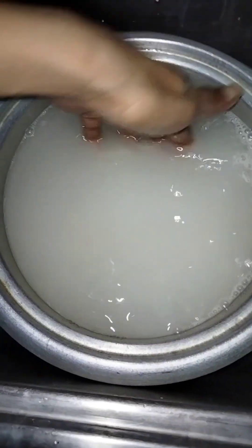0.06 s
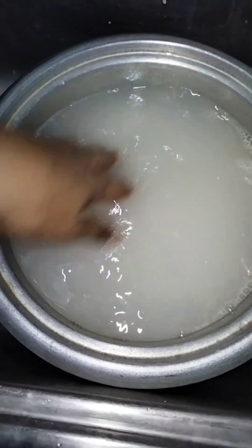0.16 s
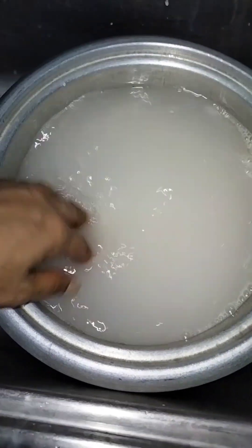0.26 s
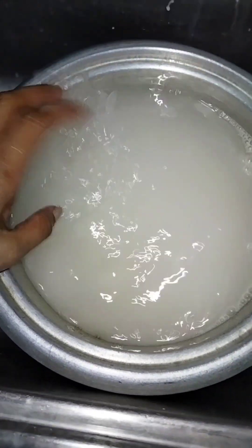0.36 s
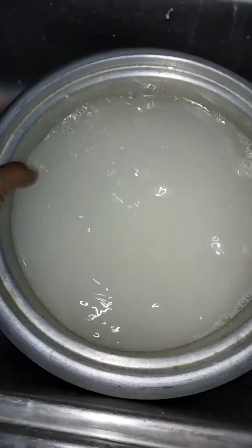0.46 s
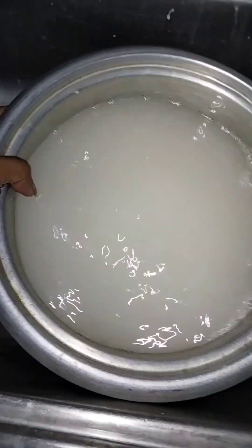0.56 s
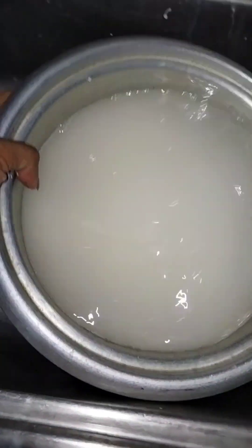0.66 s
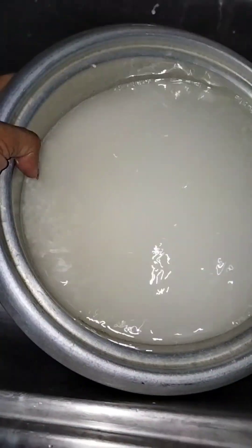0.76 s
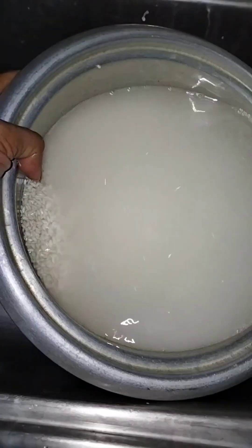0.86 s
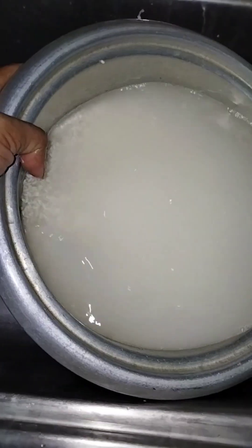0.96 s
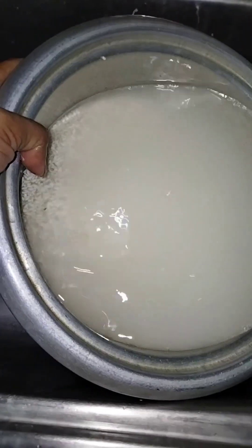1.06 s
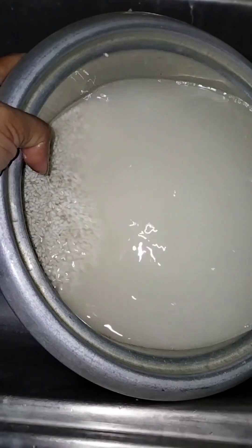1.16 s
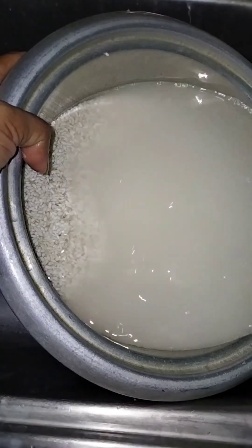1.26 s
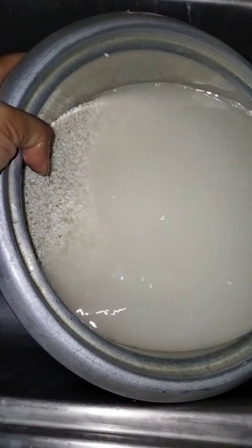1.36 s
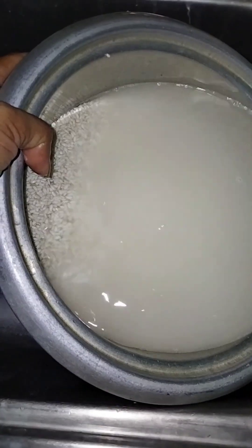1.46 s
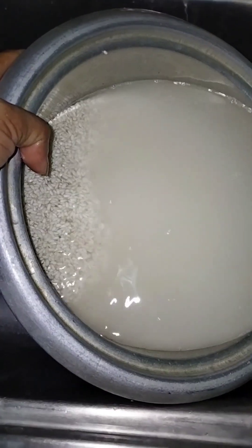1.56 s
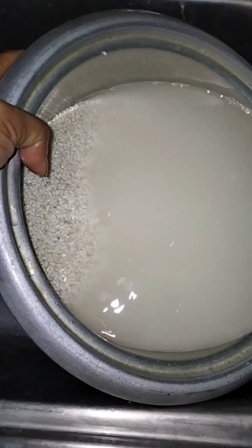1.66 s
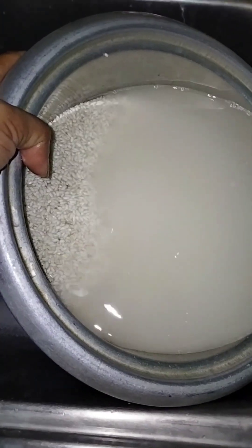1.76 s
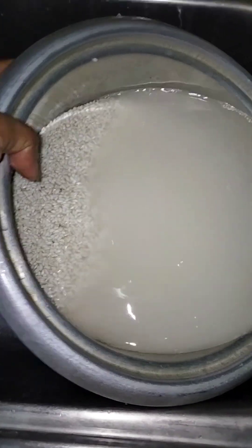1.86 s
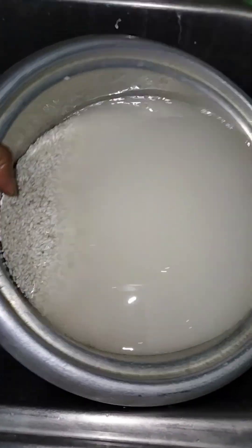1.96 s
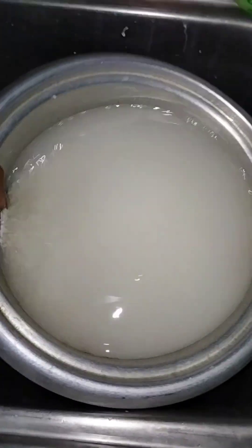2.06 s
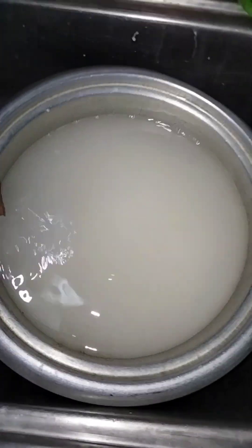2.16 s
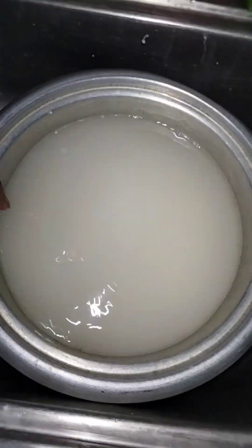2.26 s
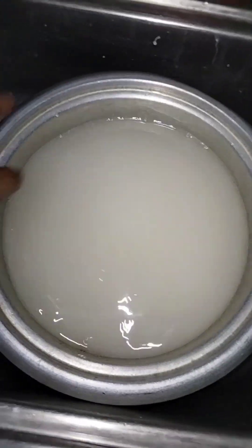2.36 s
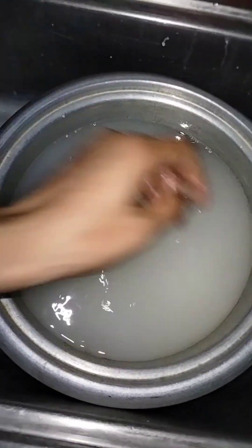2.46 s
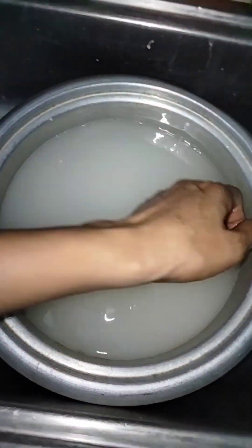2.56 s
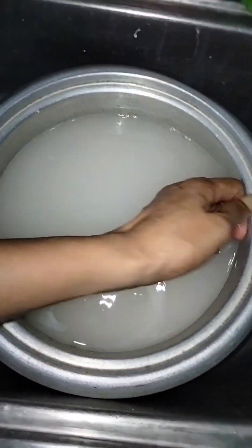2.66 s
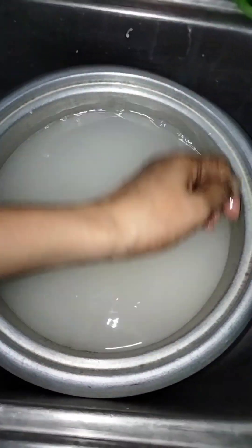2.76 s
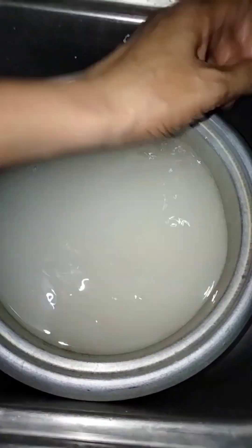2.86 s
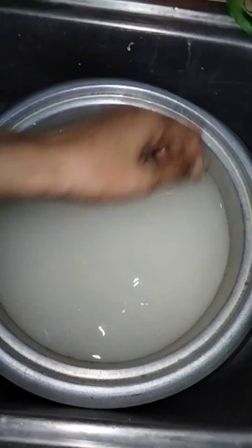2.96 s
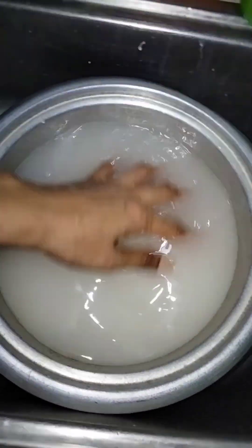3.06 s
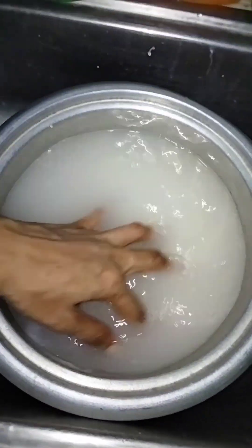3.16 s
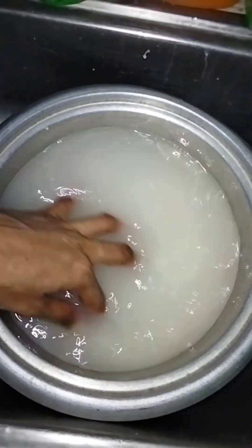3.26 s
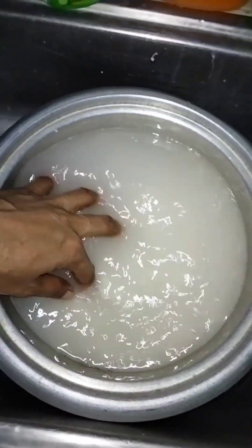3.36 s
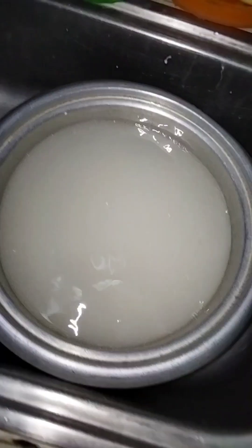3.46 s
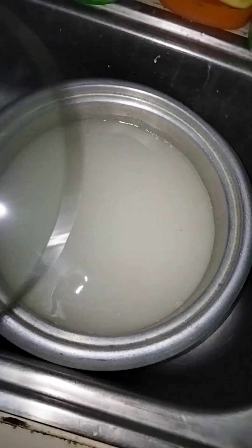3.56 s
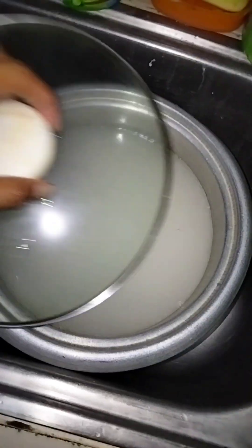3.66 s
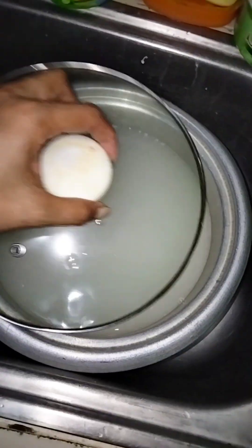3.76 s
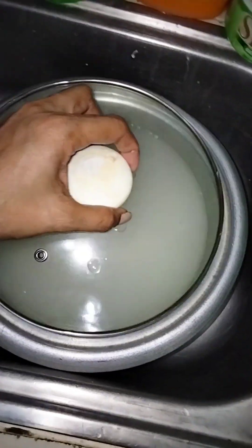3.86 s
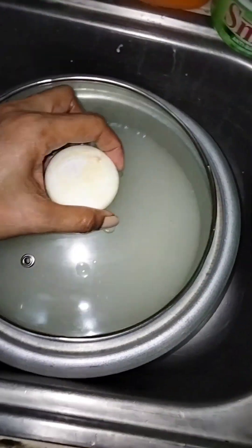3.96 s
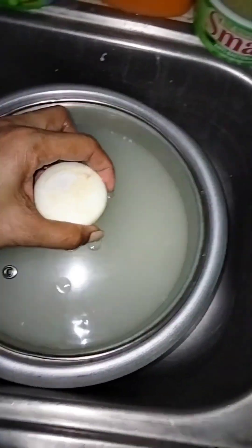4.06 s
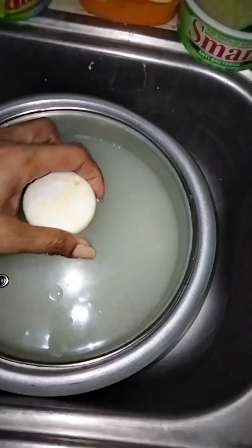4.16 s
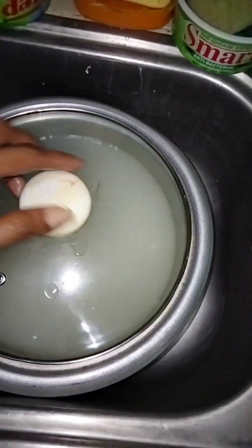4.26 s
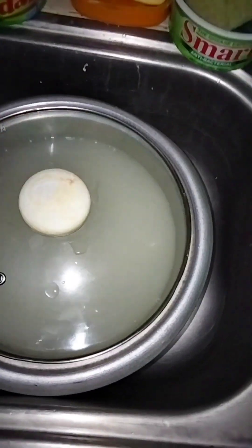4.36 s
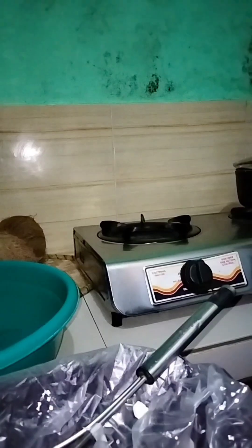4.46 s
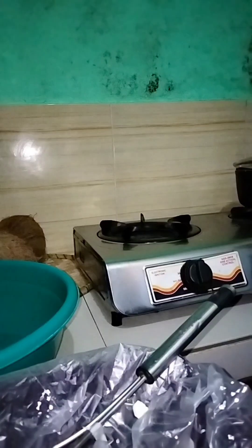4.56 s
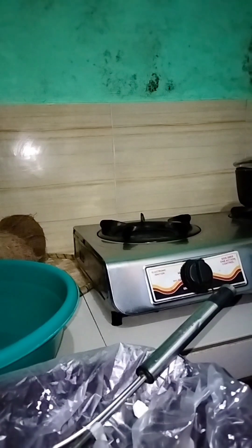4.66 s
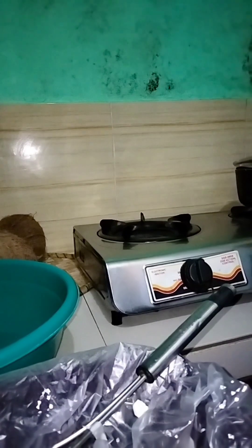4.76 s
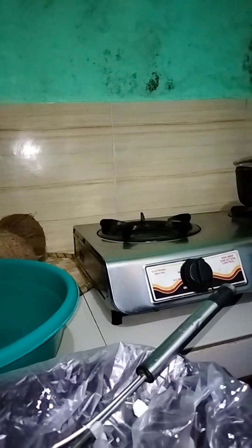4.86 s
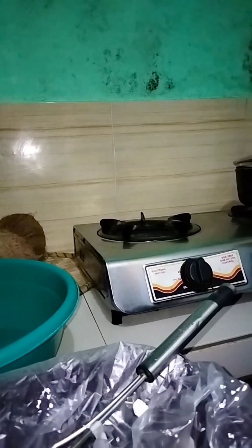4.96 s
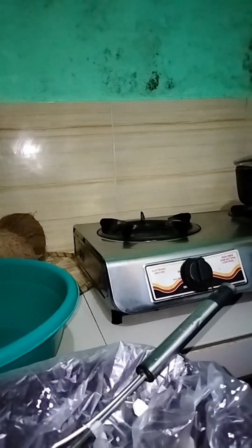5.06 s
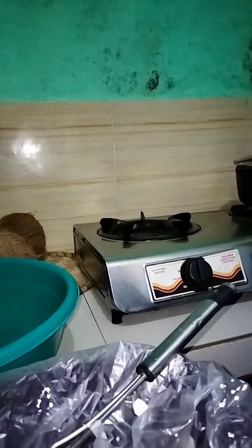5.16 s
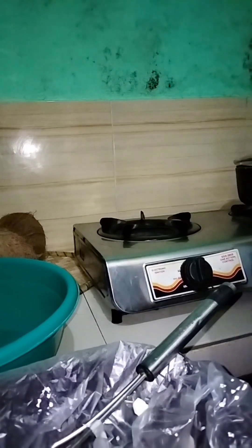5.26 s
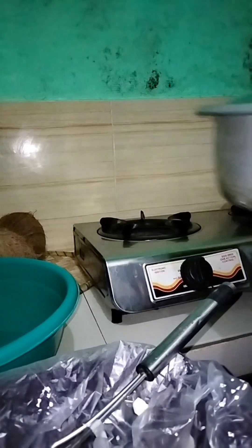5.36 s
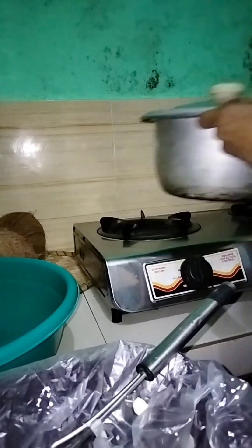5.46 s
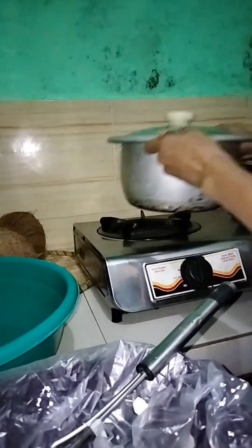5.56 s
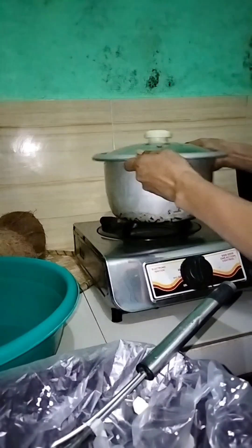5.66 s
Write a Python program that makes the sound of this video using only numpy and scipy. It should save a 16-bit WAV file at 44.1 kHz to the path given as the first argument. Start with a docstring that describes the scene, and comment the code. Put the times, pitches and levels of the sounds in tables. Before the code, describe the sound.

Close, slightly thin pickup of rice washing in a small kitchen. A dull knock comes early, then sharp grainy clicks, a fine wet rustle and small ringing drops, with a soft slosh as the pot settles. After sparse taps and a lull, a glass lid clatters onto the metal rim in two main contacts, the second heaviest. One last faint stir of grains fades into hum.

```python
"""A quiet kitchen hums and hisses throughout. A thin metal pot of rice and water first thumps on a steel sink.
Tipped and swirled, its wet grains rustle and tick, water sloshes and drops ring: enveloped grain noise and sines.
A fingertip pings the rim, then a glass lid rattles on as the pot thumps hardest: contacts ring decaying modes.
A last stir of rice and a few ticks follow. The treble spectra peak near 9 kHz, lifted by the small microphone."""
import sys
import numpy as np
from scipy import signal
from scipy.fft import rfft, irfft
from scipy.io import wavfile

SR = 44100
rng = np.random.default_rng(int(sys.argv[2]) if len(sys.argv) > 2 else 0)


def dump(signal):
    """Clip the signal to [-1, 1] and save it as 16-bit WAV at the path in sys.argv[1]."""
    limited = np.clip(np.atleast_2d(signal).T, -1, 1)
    pcm = np.round(limited * 32767).astype(np.int16)
    wavfile.write(sys.argv[1], SR, pcm)


N = 251811


def from_db(db):
    """Decibels to gain."""
    return 10 ** (np.asarray(db) / 20)


def rms_one(x):
    """Scale to rms 1."""
    return x / np.sqrt(np.mean(x ** 2) + 1e-20)


def in_time(rows):
    """Columns of a curve table interpolated at every sample."""
    time_s, *columns = np.transpose(rows)
    return [np.interp(np.arange(N) / SR, time_s, column) for column in columns]


def colour(x, spectrum):
    """Causal unit-energy filter with the given spectrum, minimum phase through the cepstrum."""
    hz, db = np.transpose(spectrum)
    size, half = 16384, 8192
    grid_hz = np.maximum(np.fft.rfftfreq(size, 1 / SR), 1)
    grid_db = np.interp(np.log(grid_hz), np.log(hz), db, left=-60, right=-60)
    cepstrum = irfft(grid_db * np.log(10) / 20)
    # fold onto positive time
    cepstrum[1:half] *= 2
    cepstrum[half + 1:] = 0
    impulse = irfft(np.exp(rfft(cepstrum)))[:half]
    return signal.fftconvolve(x, impulse / np.sqrt(np.sum(impulse ** 2)))[:len(x)]


def drift(rate_hz):
    """Slow random wander: noise through a double real pole; mean 0, spread 1."""
    r = np.exp(-2 * np.pi * rate_hz / SR)
    slow = signal.lfilter([1], [1, -2 * r, r * r], rng.standard_normal(N + SR))[SR:]
    return rms_one(slow - slow.mean())


def grains(per_s, spread_db, clump_db, clump_hz, smooth):
    """Random clicks of uneven size over smooth noise, arriving in clumps; rms 1."""
    sizes = from_db(spread_db * np.minimum(rng.exponential(1, N), 4)) * rng.choice([-1, 1], N)
    clicks = rms_one(sizes * (rng.random(N) < per_s / SR))
    bed = smooth * rng.standard_normal(N)
    clumps = from_db(clump_db * drift(clump_hz))
    return rms_one((clicks + bed) * clumps)


def add(out, time_s, sound):
    """Mix a sound in at a moment."""
    i = round(time_s * SR)
    out[i:i + len(sound)] += sound[:N - i]


def ring(clicks, hz, t60_s):
    """Two-pole resonator: a unit click sets a sine of about height 1 ringing."""
    r, w = from_db(-60 / (t60_s * SR)), 2 * np.pi * hz / SR
    return signal.lfilter([0, np.sin(w)], [1, -2 * r * np.cos(w), r * r], clicks + 1e-18)


def bubbles(clicks, low_hz, high_hz, cycles, count):
    """Every click is a small bubble: it is dealt a pitch and rings for some cycles; rms 1."""
    dealt = rng.integers(0, count, N)
    total = np.zeros(N)
    for k, hz in enumerate(np.geomspace(low_hz, high_hz, count)):
        total += ring(clicks * (dealt == k), hz, cycles / hz) * np.sqrt(hz)
    return rms_one(total)


def swell(t, rise_s, t60_s):
    """Rounded rise, then an exponential fall."""
    rise = 1 - np.exp(-(t / max(rise_s, .0002)) ** 2)
    return rise * from_db(-60 * t / max(t60_s, .004))


# rumble swell: (time [s], level [dB])
RUMBLE_LEVEL = [(0.0, -61), (0.38, -65.5), (0.7, -56.5), (0.9, -66.5), (1.4, -67.5), (2.22, -59),
                (3.32, -64), (3.61, -61.5), (4.05, -65), (4.33, -57.5), (4.61, -66), (5.12, -63.5),
                (5.71, -66.5)]
# rumble spectrum: (frequency [Hz], relative density [dB])
RUMBLE_SPECTRUM = [(8.8, -27.5), (15, 9.5), (33, -1.5), (41, -0.5), (49, -28), (65, -6), (124, -6.5),
                   (137, -5.5), (151, -26.5), (200, -22), (260, -52), (440, -120)]
# still air and microphone hiss: (frequency [Hz], relative density [dB])
HISS_SPECTRUM = [(88, -30), (150, -10), (209, -25.5), (309, -6.5), (431, -9.5), (837, -18), (998, -13.5),
                 (1390, -19), (2270, -24), (5910, -30), (7620, -28), (8730, -19), (10400, -31),
                 (15100, -29), (16000, -35)]
HISS_DB = -81.5


def hum():
    """Low rumble of the building, wavering in level, over a steady smooth hiss; both coloured noise."""
    level_db, = in_time(RUMBLE_LEVEL)
    rumble = from_db(level_db + .8 * drift(4.6)) * colour(rng.standard_normal(N), RUMBLE_SPECTRUM)
    return rumble + from_db(HISS_DB) * colour(rng.standard_normal(N), HISS_SPECTRUM)


# thin tones: (time [s], length [s], frequency [Hz], glide [Hz/s], start level [dB], fade [dB/s])
FAINT_TONES = [(0.215, 0.069, 800, 1, -72, 36), (0.23, 0.041, 1055, 2, -69, 60),
               (0.7, 0.21, 515, -120, -69, 52), (1.122, 0.11, 736, 207, -70.5, 126),
               (3.593, 0.17, 9380, 398.5, -90, 60), (3.965, 0.14, 607, 400, -54.5, 115),
               (4.412, 0.2, 9300, 897.5, -80.5, 87), (4.507, 0.042, 676, -6, -63, 105),
               (4.595, 0.06, 506, 9, -70.5, 55), (4.73, 0.077, 508, 0, -75, -38),
               (4.83, 0.092, 497, 4.5, -68, 197), (4.95, 0.065, 522, 0, -70, 4),
               (5.02, 0.099, 498, -150, -87, 0), (5.58, 0.17, 615, 150, -84.5, 3),
               (5.58, 0.16, 1230, 295, -87.5, 5)]


def faint_tones():
    """Slightly unsteady sines that glide a little, change level and stop."""
    out = np.zeros(N)
    for time_s, length_s, hz, glide_hz_per_s, start_db, fade_db_per_s in FAINT_TONES:
        t = np.arange(round(length_s * SR)) / SR
        gate = np.clip(np.minimum(t, length_s - t) / 0.0086, 0, 1)
        sine = np.sqrt(2) * np.sin(2 * np.pi * (hz + glide_hz_per_s * t / 2) * t)
        add(out, time_s, gate * from_db(start_db - fade_db_per_s * t) * sine)
    return out * from_db(3.0 * drift(30))


KITCHEN_T60_S, WALL_CUT_HZ = 0.2, 22000


def kitchen(x):
    """Diffuse tail: dying noise after 4 ms, with a nearly open low-pass for the walls."""
    t = np.arange(SR // 2) / SR
    tail = rng.standard_normal(len(t)) * from_db(-60 * t / KITCHEN_T60_S) * (t > .004)
    tail = signal.sosfilt(signal.butter(1, WALL_CUT_HZ, fs=SR, output="sos"), tail)
    return signal.fftconvolve(x, tail / np.sqrt(np.sum(tail ** 2)))[:N]


# water against hand and wall: (time [s], level [dB])
LAPPING_LEVEL = [(0.0, -58.5), (0.085, -77.5), (0.11, -58.5), (0.17, -84), (0.25, -75.5), (0.426, -85),
                 (0.62, -74), (0.842, -81.5), (1.3, -82.5), (1.5, -78), (1.63, -83.5), (1.786, -74),
                 (2.1, -70.5), (2.35, -72.5), (2.55, -77), (2.62, -74.5), (2.69, -79), (2.75, -73),
                 (3.126, -89.5), (3.8, -86), (4.008, -65.5), (4.05, -72.5), (4.12, -68.5), (4.562, -80.5),
                 (4.682, -91), (5.0, -78.5), (5.42, -93), (5.71, -88.5)]
# lapping spectrum: (frequency [Hz], relative density [dB])
LAPPING_SPECTRUM = [(290, -27), (500, -0.5), (555, -13.5), (607, -1.5), (1090, -6), (1470, -10),
                    (2600, -11.5), (3380, -50), (5720, -120)]


def lapping():
    """Water laps against hand and wall: middle-sized bubbles ring in a soft wash."""
    level_db, = in_time(LAPPING_LEVEL)
    pops = grains(600, 2.8, 1.4, 20, smooth=1.1)
    wash = bubbles(pops, 500, 2600, 22.0, count=14)
    return from_db(level_db) * rms_one(colour(wash, LAPPING_SPECTRUM))


CHIRPS_PER_S, CHIRP_T60_S = 70, 0.025
CHIRP_RISE_PER_S = 11   # share of the pitch


def chirps():
    """Small drops at random moments, pitches and sizes, each rising in pitch as it dies."""
    out, t = np.zeros(N), np.arange(SR // 20) / SR
    for when, pitch, size in rng.random((round(CHIRPS_PER_S * N / SR), 3)):
        hz = 2200 * 2.8 ** pitch * (1 + CHIRP_RISE_PER_S * t / 2)
        fall = from_db(-16 * size) * swell(t, .001, CHIRP_T60_S)
        add(out, when * N / SR, fall * np.sin(2 * np.pi * hz * t))
    return out


# wet rice, fine rustle: (time [s], level [dB])
RICE_LEVEL = [(0.0, -89.5), (0.59, -80.5), (0.638, -72.5), (0.778, -86.5), (1.2, -85.5), (1.444, -60),
              (1.746, -91), (1.794, -61), (1.91, -55), (1.966, -63.5), (2.038, -57), (2.3, -74),
              (2.694, -87.5), (3.3, -83), (3.6, -100), (3.89, -87), (3.94, -48), (4.062, -85.5),
              (4.128, -59.5), (4.3, -72), (4.496, -92), (4.784, -87.5), (4.942, -64), (5.05, -78.5),
              (5.47, -86), (5.606, -68), (5.71, -81.5)]
# moving water, low slosh: (time [s], level [dB])
WATER_LEVEL = [(0.0, -58.5), (0.092, -87.5), (0.59, -76.5), (0.638, -57), (0.778, -79), (1.018, -81.5),
               (1.2, -69.5), (1.318, -79), (1.444, -67), (1.7, -76.5), (1.91, -64.5), (2.1, -59.5),
               (2.172, -54), (2.3, -68.5), (2.5, -67.5), (2.694, -79.5), (3.8, -83), (3.94, -54),
               (4.062, -79), (4.128, -35.5), (4.3, -62.5), (4.496, -74), (4.6, -80.5), (4.942, -73.5),
               (5.2, -77), (5.71, -82.5)]
# fine grain spectrum, also of ticks: (frequency [Hz], relative density [dB])
RUSTLE_SPECTRUM = [(3530, -23), (6000, -20), (6870, -17), (7960, -5.5), (8790, 0), (9230, -2.5),
                   (9980, -10.5), (10800, -12), (13600, -17.5), (15100, -12), (16000, -34.5)]
# splash spectrum, also of ticks: (frequency [Hz], relative density [dB])
SPLASH_SPECTRUM = [(590, -33), (1000, -14), (1750, -11.5), (2170, -4), (3180, -5), (3530, -3.5), (4330, -3),
                   (7000, -10), (9100, -46.5), (15400, -120)]
# slosh spectrum: (frequency [Hz], relative density [dB])
SLOSH_SPECTRUM = [(76, -34), (130, -10.5), (216, -13.5), (255, -7), (479, -5), (554, -19), (610, -8),
                  (900, -19.5), (1170, -44.5), (1980, -120)]
SPLASH_DB, SPLASH_FOLLOWS = -86.5, 0.83   # splash at a rustle of -80 dB; share of the rustle's swing
CHIRP_DB = 12   # largest chirps, over the splash


def stirring():
    """Rice rubs on rice and metal in fine grains; water fizzes in small bubbles and sloshes in large ones."""
    (rustle_db,), (slosh_db,) = in_time(RICE_LEVEL), in_time(WATER_LEVEL)
    splash_db = SPLASH_DB + SPLASH_FOLLOWS * (rustle_db + 80)
    surge = from_db(0.97 * drift(20))      # shared by rustle and splash
    rubs = bubbles(grains(6900, 2.1, 1.1, 72, smooth=.7), 4500, 22000, 19.0, count=14)
    fizz = grains(1800, 3.6, 1.6, 40, smooth=.8)
    gurgle = grains(300, 3.0, 1.8, 12, smooth=.9)
    rustle = rms_one(colour(rubs, RUSTLE_SPECTRUM))
    splash = rms_one(colour(bubbles(fizz, 900, 6500, 18.0, count=16), SPLASH_SPECTRUM))
    slosh = rms_one(colour(bubbles(gurgle, 150, 1018, 21.0, count=12), SLOSH_SPECTRUM))
    splash = splash + from_db(CHIRP_DB) * chirps()
    treble = surge * (from_db(rustle_db) * rustle + from_db(splash_db) * splash)
    return treble + from_db(slosh_db) * slosh


# drops ringing near one pitch: (time [s], nominal level [dB], frequency [Hz], t60 [s])
DROP_HITS = [(0.103, -54, 1094, 0.036), (0.401, -55, 972, 0.026), (0.404, -48.5, 1271, 0.08),
             (0.405, -52, 2230, 0.05), (0.6156, -47, 2090, 0.042), (1.3175, -47, 4440, 0.023),
             (1.4302, -24, 3590, 0.02), (1.722, -62.5, 5100, 0.13), (1.842, -48, 3120, 0.048),
             (1.8526, -40, 2930, 0.03), (1.8612, -39, 3490, 0.042), (1.934, -49.5, 3950, 0.072),
             (1.953, -53, 3050, 0.068), (2.0502, -51, 2220, 0.049), (2.0624, -37, 4800, 0.028),
             (2.079, -45, 5420, 0.056), (2.9223, -55, 3400, 0.019), (3.086, -67.5, 1510, 0.066),
             (3.15, -60, 2080, 0.012), (3.477, -58, 4270, 0.014), (4.9858, -50, 3795, 0.044),
             (5.003, -52.5, 1905, 0.028)]
BEAT_SHARE = 0.046   # pitch spread at 4 kHz, in proportion elsewhere
MAX_RISE_S = 0.003   # drops and ticks


def drops():
    """Each drop is a knot of three bubbles beating near one pitch."""
    out, t = np.zeros(N), np.arange(SR // 7) / SR
    detunings = rng.normal(0, 1, (len(DROP_HITS), 3, 1))
    for (time_s, level_db, hz, t60_s), detuning in zip(DROP_HITS, detunings):
        bubble_hz = hz * (1 + BEAT_SHARE * hz / 4000 * detuning)
        knot = np.sum(np.sin(2 * np.pi * bubble_hz * t), axis=0)
        envelope = swell(t, min(MAX_RISE_S, t60_s / 10), t60_s)
        add(out, time_s, from_db(level_db - 3) * envelope * knot)
    return out


# grain and drop ticks, levels before the mix trims:
# (time [s], level above 6.5 kHz [dB], level of 1.2-6.5 kHz [dB], t60 [s])
TICK_HITS = [(0.006, -77, -70, 0.097), (0.097, -82.5, -67, 0.085), (0.133, -63, -69, 0.037),
             (0.224, -61, -88, 0.025), (0.397, -51, -55.5, 0.034), (0.404, -55, -53.5, 0.13),
             (0.428, -52, -52, 0.036), (0.4574, -49, -56, 0.063), (0.478, -60, -88, 0.12),
             (0.6144, -39.5, -42.5, 0.064), (1.263, -52, -86, 0.024), (1.282, -51.5, -84, 0.036),
             (1.3182, -34, -44.5, 0.025), (1.347, -47, -81, 0.069), (1.367, -51, -87, 0.076),
             (1.4293, -25.5, -39, 0.03), (1.464, -48, -50.5, 0.092), (1.475, -45, -43, 0.041),
             (1.508, -42.5, -64, 0.046), (1.5254, -54, -55, 0.09), (1.5783, -50, -89, 0.026),
             (1.6016, -44.5, -86, 0.026), (1.69, -53, -82, 0.073), (1.717, -61, -67, 0.11),
             (1.7374, -52.5, -72, 0.2), (1.77, -39, -81, 0.035), (1.8018, -31, -64, 0.032),
             (1.84, -36, -47, 0.058), (1.852, -32.5, -63, 0.024), (1.859, -56, -48.5, 0.065),
             (1.8806, -34, -70, 0.031), (1.9345, -42, -48.5, 0.089), (1.953, -39, -49, 0.035),
             (1.9969, -45, -82, 0.043), (2.032, -42.5, -52.5, 0.12), (2.0513, -37, -43, 0.077),
             (2.0637, -38.5, -49, 0.038), (2.078, -43.5, -54, 0.19), (2.165, -52, -72, 0.048),
             (2.192, -61, -62, 0.088), (2.4316, -62, -67, 0.15), (2.695, -62, -66, 0.14),
             (2.706, -68, -55.5, 0.04), (2.7467, -37, -48, 0.042), (2.9226, -49.5, -69, 0.016),
             (3.086, -50.5, -60.5, 0.037), (3.15, -36, -42, 0.015), (3.476, -43, -46.5, 0.013),
             (3.548, -63.5, -70, 0.056), (4.6865, -64.5, -70, 0.066), (4.798, -60.5, -71, 0.059),
             (4.8423, -54, -68, 0.038), (4.931, -55.5, -77, 0.064), (4.986, -48, -56.5, 0.11),
             (5.0044, -46, -54.5, 0.038), (5.282, -67, -65, 0.048), (5.3452, -64, -66.5, 0.36),
             (5.378, -61, -57, 0.029)]


def ticks():
    """Each tick is a burst that swells and dies fast, gritty when short and smooth when long."""
    top, middle, t = np.zeros((2, N)), np.zeros((2, N)), np.arange(SR // 7) / SR
    for time_s, top_db, middle_db, t60_s in TICK_HITS:
        envelope = swell(t, min(MAX_RISE_S, t60_s / 10), t60_s)
        start_s = time_s - MAX_RISE_S / 2
        smooth = np.clip((t60_s - .04) / .07, 0, 1)
        for kind, share in enumerate(np.sqrt([1 - smooth, smooth])):   # gritty, smooth
            add(top[kind], start_s, share * from_db(top_db) * envelope)
            add(middle[kind], start_s, share * from_db(middle_db) * envelope)
    grit = top[0] * grains(5000, 3.1, 0.55, 250, smooth=0.84) + top[1] * rng.standard_normal(N)
    spray = middle[0] * grains(2500, 1.6, 1.0, 130, smooth=0.61) + middle[1] * rng.standard_normal(N)
    spray_rms = np.sqrt(np.mean(spray ** 2))
    fizz = bubbles(spray, 1200, 6500, 16.0, count=14) * spray_rms
    return from_db(-4.5) * colour(grit, RUSTLE_SPECTRUM) + from_db(-8.5) * colour(fizz, SPLASH_SPECTRUM)


# fingertip on the pot's rim: (time [s], level [dB], rise [s])
PING_HITS = [(2.692, -63, 0.008), (2.746, -49.5, 0.0022)]
# rim modes: (frequency [Hz], relative level [dB], t60 [s])
RIM_MODES = [(4000, -6, 0.036), (4480, -3, 0.051), (5100, 0, 0.03), (6300, -18, 0.035), (7000, 3.5, 0.078),
             (8630, 6, 0.078)]


def pings():
    """A light touch rings the rim modes, with uneven strengths."""
    out, t = np.zeros(N), np.arange(SR // 7) / SR
    luck_db = rng.normal(0, 2, (len(PING_HITS), len(RIM_MODES)))
    for (time_s, level_db, rise_s), strengths_db in zip(PING_HITS, luck_db):
        for (hz, mode_db, t60_s), strength_db in zip(RIM_MODES, strengths_db):
            gain = from_db(level_db + mode_db + strength_db)
            add(out, time_s, gain * swell(t, rise_s, t60_s) * np.sin(2 * np.pi * hz * t))
    return out


# glass lid on the rim, before the mix trims:
# (time [s], level [dB], t60 of the contact [s], ringing against the crack [dB])
LID_TOUCHES = [(3.8429, -16, 0.015, -22), (3.845, -23, 0.03, -18.5), (3.891, -37, 0.051, -32),
               (3.92, -14.5, 0.046, -21), (3.943, -33, 0.078, -44), (4.0902, -36.5, 0.13, -25),
               (4.1044, -37.5, 0.33, -30), (4.121, -12, 0.068, -21), (4.136, -26, 0.026, -32),
               (4.1474, -30.5, 0.071, -44), (4.1734, -18.5, 0.027, -22.5), (4.2546, -41.5, 0.034, -21),
               (4.305, -46.5, 0.13, -24), (4.326, -46, 0.12, -26), (4.3424, -47, 0.048, -26),
               (4.3803, -61.5, 0.074, -28), (4.395, -51, 0.046, -23), (4.4776, -34.5, 0.015, -30)]
# glass modes: (frequency [Hz], relative level [dB], t60 before finger damping [s])
LID_MODES = [(2964, -27, 0.091), (3260, -0.5, 0.085), (3655, -25, 0.18), (3980, -17, 0.23),
             (4940, -28.5, 0.16), (5204, -8, 0.074), (5010, -6, 0.07), (6250, -5, 0.056), (7140, -8, 0.039),
             (7260, -19, 0.11), (7400, -6, 0.098), (8118, -17.5, 0.28), (8500, -5, 0.4), (9910, -6.5, 0.26)]
# crack spectrum: (frequency [Hz], relative density [dB])
CRACK_SPECTRUM = [(530, -8), (900, -15), (1440, -39.5), (1600, -4), (2600, -5), (3190, -2), (4630, -4.5),
                  (5040, -11.5), (5890, -19), (7310, -5.5), (8980, 2.5), (9880, -7.5), (16000, -12)]
LID_RISE_SHARE = 0.098   # of the t60, then limited to 1.2-5 ms
FINGER_T60_S = 0.045


def lid():
    """Each touch is a rattle of tiny contacts: they crack, and they shake the lid modes, damped by the fingers."""
    cracks, shake, t = np.zeros(N), np.zeros(N), np.arange(SR // 7) / SR
    for time_s, level_db, t60_s, ring_db in LID_TOUCHES:
        rise_s = np.clip(LID_RISE_SHARE * t60_s, .0012, .005)
        envelope = swell(t, rise_s, t60_s)
        add(cracks, time_s - rise_s / 2, from_db(level_db - 9.0) * envelope)
        add(shake, time_s - rise_s / 2, from_db(level_db - 9.5 + ring_db) * envelope)
    contacts = grains(6000, 4.2, 1.4, 300, smooth=0.74)
    dealt = rng.random((len(LID_MODES), N)) < .3      # each contact reaches only some modes
    rings = np.zeros(N)
    for (hz, mode_db, t60_s), reached in zip(LID_MODES, dealt):
        push = shake * contacts * reached * from_db(4 * drift(12))
        damped_t60_s = 1 / (1 / t60_s + 1 / FINGER_T60_S)
        rings += from_db(mode_db) * ring(push, hz, damped_t60_s)
    return rings + colour(cracks * contacts, CRACK_SPECTRUM)


# pot on basin:
# (time [s], level [dB], ring length factor, deep mode gain [dB], brightness [dB/octave])
THUMP_HITS = [(0.098, -66.5, 1, -11, 1.5), (0.458, -73.5, 1, 15, -14), (0.615, -34, 0.69, 1, -9),
              (0.978, -47, 0.75, -2.5, -22), (1.462, -62.5, 0.62, -17, 2), (1.496, -58.5, 0.41, -26, 3),
              (2.114, -41, 0.98, 4.5, -9), (2.137, -51, 0.91, 5, -18), (2.399, -61.5, 1, 7, -10),
              (2.443, -47.5, 0.78, 1.5, -8.5), (2.708, -49.5, 0.49, 4.5, -5.5), (2.745, -55, 0.81, 0.5, -6),
              (2.976, -65.5, 0.53, -33, -5), (3.165, -67, 0.42, -17, -5), (3.552, -70, 0.52, 8, -8),
              (3.84, -42, 0.67, -3, -8.5), (3.919, -33, 1, -5.5, -7.5), (3.96, -32, 0.39, -12, -12.5),
              (4.095, -47, 0.85, -23.5, -14), (4.124, -23, 0.68, -6, -6.5), (4.149, -37.5, 1, 2.5, -4.5),
              (4.174, -49.5, 0.66, 19.5, 0.5), (4.336, -58, 0.66, 15, -1), (4.419, -53.5, 0.35, 9.5, -9),
              (4.431, -53.5, 0.46, 1, -8), (4.692, -65, 0.39, 9, -27), (4.995, -53.5, 0.51, -8, -6.5)]
# basin modes: (frequency [Hz], relative level [dB], t60 before wet damping and length factor [s])
BASIN_MODES = [(80.4, -7.5, 0.18), (148.3, 2.5, 0.2), (191.2, -2.5, 0.2), (259, 1.5, 0.16),
               (285.7, -3, 0.32), (331, -6, 0.57), (386.2, -6.5, 0.54), (452.7, 4.5, 0.11),
               (499, -14.5, 0.56), (593, 5, 0.058), (745, -2.5, 0.14), (962, -2, 0.22), (924, -10.5, 0.12),
               (1260, -17.5, 0.3), (805, -5, 0.3), (966, -13.5, 0.12), (1077, -4.5, .1)]
DEEP_HZ, PIVOT_HZ = 145, 300   # deep gain is full up to the first; brightness tilts above the second
WASH_DB = -7.5   # against the thump level


def thumps():
    """A soft contact rings the basin modes; where it lands sets the balance of low and high. A watery wash follows."""
    out, washes, t = np.zeros(N), np.zeros(N), np.arange(SR // 3) / SR
    hz, mode_db, t60_s = np.transpose(BASIN_MODES)[:, :, None]
    t60_s = np.minimum(t60_s, 95 / hz)      # the wet steel loses high modes sooner
    build_up = 1 - np.exp(-t * hz / 0.54)      # slower in low modes
    waves = np.sin(2 * np.pi * hz * t) * build_up
    octaves_above = np.maximum(np.log2(hz / PIVOT_HZ), 0)
    deep_share = np.interp(np.log(hz), np.log([DEEP_HZ, PIVOT_HZ]), [1, 0])
    luck = rng.normal(0, 1, (len(THUMP_HITS), len(BASIN_MODES)))
    for (time_s, level_db, length, deep_db, bright_db), strength in zip(THUMP_HITS, luck):
        place_db = deep_db * deep_share + bright_db * octaves_above
        fall = np.exp(-np.log(1000) * t / (t60_s * length))
        gains = from_db(mode_db + place_db + 1.8 * strength[:, None])
        add(out, time_s, from_db(level_db) * np.sum(gains * fall * waves, axis=0))
        add(washes, time_s, from_db(level_db + WASH_DB) * swell(t, 0.0093, 0.087 * length))
    band = signal.butter(1, [250, 1500], "band", fs=SR, output="sos")
    wash = rms_one(signal.sosfilt(band, rng.standard_normal(N)))
    wavering = from_db(2.8 * drift(30))      # moving water keeps changing how the basin rings
    return out * wavering + washes * wash


TICK_ROOM_DB, KNOCK_ROOM_DB = -16, -7


def scene():
    """Blows and knocks get the room; the other layers are added as they are."""
    blows = ticks() + drops() + pings() + lid()
    knocks = thumps()
    room = from_db(TICK_ROOM_DB) * kitchen(blows) + from_db(KNOCK_ROOM_DB) * kitchen(knocks)
    return (blows + knocks + room + stirring() + lapping() + faint_tones() + hum())[None]


CUTOFF_HZ = 16450


def record(dry):
    """The top is cut steeply."""
    return signal.sosfilt(signal.cheby2(14, 50, CUTOFF_HZ, fs=SR, output="sos"), dry)


dry = scene()
out = record(dry)
dump(out)
```